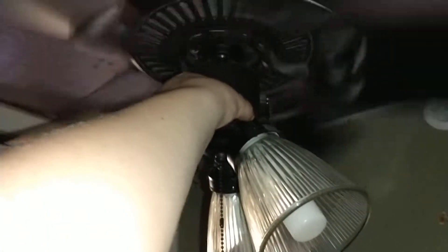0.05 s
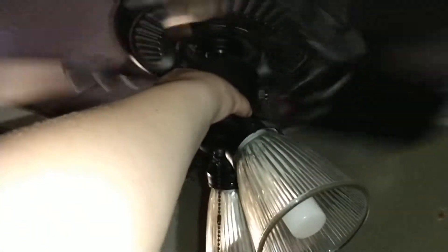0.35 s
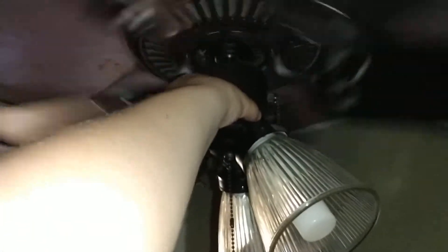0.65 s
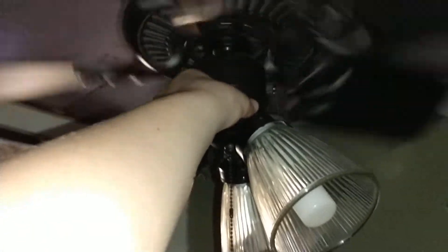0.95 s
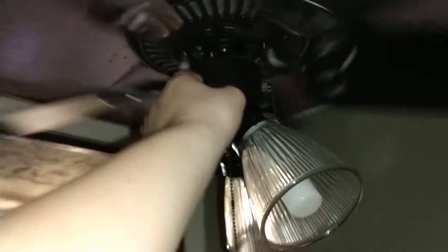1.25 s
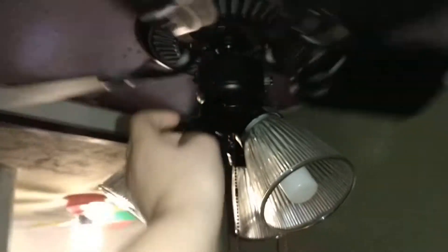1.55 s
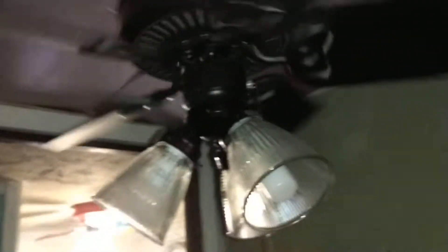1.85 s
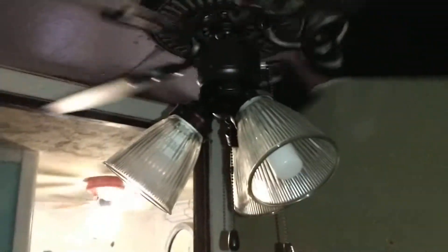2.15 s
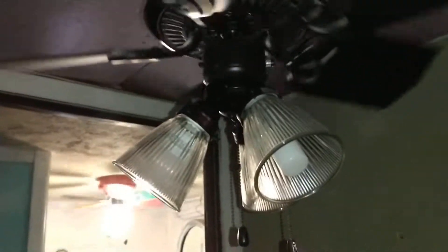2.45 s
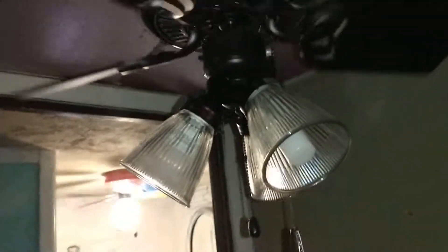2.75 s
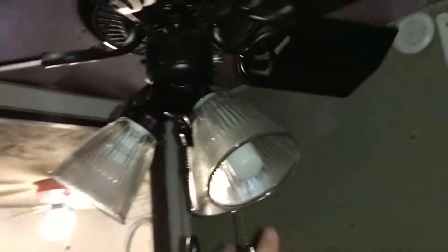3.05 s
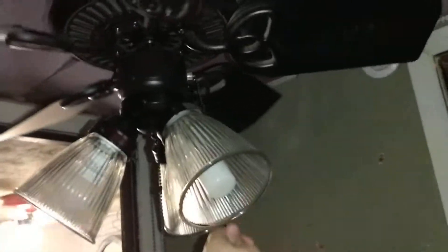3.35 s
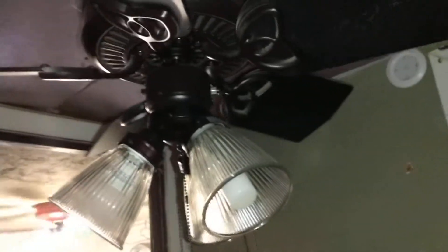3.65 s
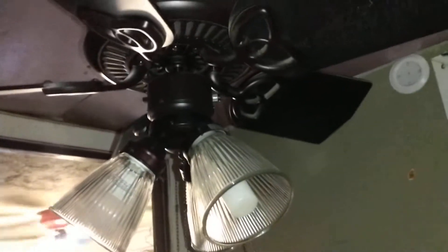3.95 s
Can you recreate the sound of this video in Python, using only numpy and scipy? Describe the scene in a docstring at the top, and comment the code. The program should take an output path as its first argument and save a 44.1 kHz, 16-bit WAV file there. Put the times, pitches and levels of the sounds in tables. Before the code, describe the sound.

A ceiling fan's draught buffets a close microphone in low puffs while a switch snaps once. The air fades as the microphone backs away, then a pull chain clicks and jingles over faint motor hum in a quiet room.

```python
"""A ceiling fan's draught buffets a microphone held just under the blades, in low, thumping puffs.
A hand snaps the slide switch on the housing and withdraws; the blade rush fades as the microphone backs off.
Later fingers knock the glass shade, tug the pull chain and let go: its beads tick and jingle, and its
ratchet switch clicks and rings the metal light fitting. Underneath lies a bed of faint motor hum and
the hiss of a small quiet room."""
import sys
import numpy as np
from scipy import signal
from scipy.fft import rfft, irfft
from scipy.io import wavfile
from scipy.ndimage import uniform_filter1d, map_coordinates

SR = 44100
rng = np.random.default_rng(int(sys.argv[2]) if len(sys.argv) > 2 else 0)


def dump_mix(stems):
    """Bounce the given channels to the path in sys.argv[1] as a 16-bit WAV at rate SR."""
    frames = np.atleast_2d(stems).T  # one column per channel
    limited = np.clip(frames, -1, 1)  # hard clip at full scale
    pcm = np.round(limited * 32767).astype(np.int16)
    wavfile.write(sys.argv[1], SR, pcm)


N = 176400
T = np.arange(N) / SR
TOP_HZ = 7650

# room hiss EQ: f/Hz, level/dB
HISS_EQ = [(24, -39), (40, -15.5), (144, -7), (230, -4), (363, -9.5), (590, -15), (680, -17.5),
           (1780, -21.5), (1940, -25), (7800, -36.5)]
# motor tones: f/Hz, early level/dB, later level/dB
HUM_TONES = [(239.7, -67, -72), (361.8, -75, -81), (586, -72, -80), (743, -78.5, -94), (1720, -85.5, -81.5)]
# fader curve of the blade rush: t/s, level/dB
RUSH_FADER = [(0, -58.5), (.9, -60), (1.25, -64.5), (1.5, -62.5), (1.75, -73.5), (2.2, -74), (4, -92.5)]
# blade rush EQ: f/Hz, level/dB
RUSH_EQ = [(60, 6), (150, 16), (600, 1), (1200, -4.5), (2400, -11.5), (4000, -27.5), (7500, -30)]
# cloth moves as the arm presses and later drops: t/s, length/s, level/dB
RUSTLE_CUES = [(.42, .06, -80), (1.9, 0.099, -79.5)]
# fingers hitting the shade: t/s, level/dB
SHADE_HITS = [(3.3886, -61), (3.398, -63.5)]
# glass shade modes: f/Hz, level/dB
SHADE_MODES = [(1250, 2.5), (1490, -6), (2200, -8.5), (2570, -10), (4520, -16)]
# tinks of the swinging chain: t/s, level/dB, f/Hz
TINK_HITS = [(0.914, -77, 6450), (.98, -76, 5630), (1.06, -75, 3730), (1.265, -75.5, 3262)]
# jingle of the released chain: t/s, length/s, level/dB
JINGLE_CUES = [(3.95, .06, -69)]
# beads tapping metal: t/s, level/dB, centre f/Hz
BEAD_HITS = [(0.1837, -69.5, 7140), (0.9431, -59.5, 3020), (3.5068, -64, 2940), (3.7536, -55, 3200),
             (3.7852, -58, 3080), (3.936, -63, 3140), (3.958, -61, 3360), (3.9767, -59, 3200)]
# chain running through its guide: t/s, length/s, level/dB
CHAIN_RUNS = [(3.5, 0.13, -76.5), (3.953, .07, -69.5)]
# chain rasp EQ: f/Hz, level/dB
RASP_EQ = [(300, -6), (900, -21), (1130, 2), (1400, -5), (2500, -7), (4400, -11), (7500, -13.5)]
# ratchet clicks: t/s, level/dB, stroke (0 = pull, 1 = return)
RATCHET_HITS = [(3.581, -57.5, 0), (3.5912, -49.5, 0), (3.6052, -39.5, 0), (3.608, -44.5, 0),
                (3.783, -57, 1), (3.7972, -42.5, 1), (3.8005, -39, 1)]
# click EQ on the pull: f/Hz, level/dB
PULL_EQ = [(200, -26), (400, 2), (800, -6.5), (1400, -10), (2400, -1.5), (3000, -3.5), (3600, 4),
           (4100, -17), (4900, -9), (5400, 2), (6100, -9), (6600, -2), (7500, -9)]
# click EQ on the return: f/Hz, level/dB
RETURN_EQ = [(200, -8), (500, -2), (900, -6), (1600, 6.5), (2000, 1.5), (2700, 3), (3400, 7), (4500, 1),
             (5500, 5), (8200, 3)]
# metal light fitting modes: f/Hz, level on the pull/dB, level on the return/dB
FITTING_MODES = [(1126, 6.5, 12), (1593, -11, 9.5), (1830, -1, -1), (2310, 2, 7.5), (2810, -2, 5),
                 (3320, -9, -6), (3530, 0, 1), (5100, -17, 2), (5440, 3, 5), (6640, -4, -2), (7120, -9, 4)]
# slide switch slipping, then snapping home: t/s, level/dB
SNAP_HITS = [(.5548, -50.5), (.5598, -42)]
# snap EQ: f/Hz, level/dB
SNAP_EQ = [(290, -30), (500, 2.5), (1290, -9), (1830, -3), (2390, -8.5), (3810, -8.5), (4530, -3),
           (5350, -7.5), (6100, 1), (7000, -3), (8000, -5.5)]
# ring of the snap in the housing: f/Hz, level/dB, t60/s
SNAP_MODES = [(761.6, 1.5, 0.22), (1100, 0.5, 0.18), (1815, -4.5, 0.31), (4310, -3, .17),
              (7100, -1.5, 0.11)]
# ring of a finger knock on the housing: f/Hz, level/dB, t60/s
KNOCK_MODES = [(518, 2, 0.036), (716, -10, 0.061), (870, -1, 0.043)]
# puffs of draught: t/s, length/s, level/dB
PUFF_CUES = [(-.01, 0.04, -38.5), (.052, 0.064, -28.5), (.192, .03, -32), (.24, 0.058, -38),
             (.328, 0.013, -25.5), (.425, 0.031, -43), (.468, 0.1, -31.5), (.565, 0.083, -34.5),
             (.675, 0.097, -41), (.812, 0.045, -33.5), (.875, 0.04, -30.5), (.955, 0.02, -43.5),
             (1.16, 0.062, -47.5), (1.412, 0.026, -49), (1.448, 0.078, -40), (1.58, 0.045, -50.5),
             (1.97, 0.024, -58.5)]
# eddy EQ, ahead of the pitch bend and low-pass: f/Hz, level/dB
EDDY_EQ = [(25, -36), (45, -29), (70, -2), (100, 3), (140, 1.5), (180, -4), (240, -16.5), (500, -34),
           (8000, -86.5)]


def undb(db):
    """Decibels to gain."""
    return 10 ** (np.asarray(db) / 20)


def unit(x):
    """Scale to rms 1."""
    return x / np.sqrt(np.mean(x ** 2))


def lowpass(x, hz):
    """Zero-phase treble roll-off."""
    return signal.sosfiltfilt(signal.butter(2, hz, fs=SR, output="sos"), x)


def noise(eq):
    """Noise of rms 1 shaped by an EQ curve of f/Hz, level/dB points."""
    hz, db = np.array(eq, float).T
    f = np.maximum(np.arange(N // 2 + 1) * SR / N, 1)
    gain = undb(np.interp(np.log(f), np.log(hz), db)) * (f < TOP_HZ + 1000)
    return unit(irfft(rfft(rng.standard_normal(N)) * gain, N))


def peak_eq(hz, width_oct):
    """EQ curve of one resonance with falling skirts."""
    f = np.geomspace(100, 9000, 90)
    return list(zip(f, -20 * np.log10(1 + (np.log2(f / hz) / width_oct) ** 2)))


def wander(rate_hz):
    """Smooth random modulator of rms 1."""
    span = int(SR / rate_hz)
    return unit(uniform_filter1d(uniform_filter1d(rng.standard_normal(N), span), span))


def decay(t, t60):
    """Envelope that falls 60 dB in t60 seconds."""
    return np.exp(-np.log(1000) * t / t60)


def swells(cues, attack_s, release_s):
    """Attack, hold and release for each cue, summed in power."""
    power = 0
    for start, length, db in cues:
        shape = np.exp(np.minimum(T - start, 0) / attack_s - np.maximum(T - start - length, 0) / release_s)
        power += (undb(db) * shape) ** 2
    return np.sqrt(power)


def place(sound, at_s, db):
    """Drop a sound on the timeline at its level."""
    return undb(db) * np.concatenate([np.zeros(int(at_s * SR)), sound, np.zeros(N)])[:N]


def ring(modes, build_s=.009, scatter_depth=.79, scatter_hz=66):
    """A struck object rings out; the room's echoes make each mode swell and dip."""
    t = T[:SR // 2]
    knots = np.arange(scatter_hz + 2) / scatter_hz
    tone = 0
    for hz, db, t60 in modes:
        scatter = rng.standard_normal((256, 2))[:len(knots)] @ [1, 1j] / np.sqrt(2)
        echoes = 1 + scatter_depth * np.interp(t, knots, scatter)
        partial = np.exp(2j * np.pi * (hz * t + rng.random()))
        tone += undb(db) * decay(t, t60) * np.imag(echoes * partial)
    rms = np.sqrt(sum(undb(db) ** 2 for _, db, _ in modes) / 2)
    return tone * (1 - np.exp(-t / build_s)) / rms


def click(eq, room_db, room_build_s=.0085):
    """A short dense crack and a room tail whose treble dies first."""
    t = T[:SR // 2]
    crack, tail = noise(eq)[:2 * len(t)].reshape(2, -1)
    crack_power = uniform_filter1d(np.abs(signal.hilbert(crack)) ** 2, size=48) / 2
    crack = crack / np.sqrt(crack_power) * decay(t, t60=.035)
    lows = lowpass(tail, 2200)
    room = lows * decay(t, t60=.24) + (tail - lows) * decay(t, t60=.16)
    return crack + undb(room_db) * room * (1 - np.exp(-t / room_build_s))


def room_hiss():
    """Quiet room tone, breathing slightly in level."""
    return noise(HISS_EQ) * undb(-65 + .5 * wander(2.6))


def motor_hum(shift_s=(.95, 1.48), waver=.15, drift_rad=.11):
    """Wavering motor tones whose balance shifts: most fade as the microphone backs off, while a 1720 Hz whine
    grows louder."""
    hum = 0
    for hz, early_db, late_db in HUM_TONES:
        level = undb(np.interp(T, shift_s, [early_db, late_db])) * (1 + waver * wander(6))
        hum += level * np.sqrt(2) * np.sin(2 * np.pi * hz * T + drift_rad * wander(5.8))
    return hum


def blade_rush():
    """Air flutters off the blades, fading as the microphone backs off."""
    fader_db = np.interp(T, *np.array(RUSH_FADER).T)
    return noise(RUSH_EQ) * undb(fader_db + 1.5 * wander(23))


def cloth_rustle():
    """The moving arm brushes softly against cloth."""
    return noise(peak_eq(5200, width_oct=.83)) * swells(RUSTLE_CUES, attack_s=.031, release_s=.04)


def shade_knocks(t60=.066):
    """Fingers reaching for the chain knock the hollow glass shade."""
    modes = [(hz, db, t60) for hz, db in SHADE_MODES]
    return sum(place(ring(modes, build_s=.00036), at_s, db) for at_s, db in SHADE_HITS)


def chain_tinks(detune=.096, t60=.22):
    """The brushed chain swings and tinks, each tink a cluster of six detuned modes."""
    tinks = 0
    for at_s, db, hz in TINK_HITS:
        cluster = [(hz * (1 + detune * offset), 0, t60) for offset in rng.random(6) - .5]
        tinks += place(ring(cluster, build_s=.0092), at_s, db)
    return tinks


def chain_jingle():
    """Once let go, the beads jingle together in a narrow, bright band."""
    return noise(peak_eq(3290, width_oct=.13)) * swells(JINGLE_CUES, attack_s=.012, release_s=.03)


def bead_ticks():
    """Single beads tick against the metal."""
    return sum(place(click(peak_eq(hz, width_oct=.18), room_db=-8.5), at_s, db) for at_s, db, hz in BEAD_HITS)


def chain_rasp():
    """The chain grates through its guide and unevenly rings the fitting's lowest mode."""
    rasp = unit(noise(RASP_EQ) * undb(4 * wander(250)))
    ring_level = undb(.5) * (1 + .5 * wander(50))
    ringing = ring_level * np.sin(2 * np.pi * FITTING_MODES[0][0] * T + wander(40.9))
    return (rasp + ringing) * swells(CHAIN_RUNS, attack_s=.018, release_s=.021)


def pull_switch(room_db=(-8.5, -4), ring_db=(-9.5, -6), lowest_t60=.18, damping_power=.22):
    """The ratchet clicks on pull and return; each stroke's hardest snap rings the fitting."""
    eqs = (PULL_EQ, RETURN_EQ)
    lowest_hz = FITTING_MODES[0][0]
    mix = sum(place(click(eqs[stroke], room_db[stroke]), at_s, db) for at_s, db, stroke in RATCHET_HITS)
    for stroke in (0, 1):
        snap_db, snap_s = max((db, at_s) for at_s, db, which in RATCHET_HITS if which == stroke)
        modes = [(hz, levels[stroke], lowest_t60 * (lowest_hz / hz) ** damping_power)
                 for hz, *levels in FITTING_MODES]
        mix += place(ring(modes), snap_s, snap_db + ring_db[stroke])
    return mix


def slide_switch():
    """The slide switch snaps in its housing; a finger knocks it on leaving."""
    snaps = 0
    for at_s, db in SNAP_HITS:
        housing = undb(-15) * ring(SNAP_MODES)
        snaps += place(click(SNAP_EQ, room_db=-6) + housing, at_s, db)
    return snaps + place(ring(KNOCK_MODES, build_s=.00036), at_s=1.0228, db=-47.5)


def draught(eddy_hz=139, compression=.09, bend_power=.11, unbent_db=-30.5):
    """Eddies thump the microphone in puffs, bending up in pitch as a puff grows."""
    puffs = swells(PUFF_CUES, attack_s=.0076, release_s=.012)
    eddies = signal.hilbert(noise(EDDY_EQ))
    strength = np.sqrt(uniform_filter1d(np.abs(eddies) ** 2, int(3 * SR / eddy_hz)))  # over three cycles
    rumble = unit(eddies.real / strength ** compression)
    speed = (puffs / undb(unbent_db)) ** bend_power
    thumps = puffs * map_coordinates(rumble, [np.cumsum(speed)], mode="mirror")
    return lowpass(thumps, 400)


def scene():
    """Mono mix of draught, switches, chain and handling over the bed."""
    mix = draught() + slide_switch() + pull_switch()
    mix += bead_ticks() + chain_rasp() + chain_tinks() + chain_jingle()
    mix += shade_knocks() + cloth_rustle()
    mix += motor_hum() + blade_rush() + room_hiss()
    return mix[None]


def record(dry):
    """A steep master low-pass takes off the top end."""
    return signal.sosfilt(signal.cheby1(14, .2, TOP_HZ, fs=SR, output="sos"), dry)


dry = scene()
out = record(dry)
dump_mix(out)
```